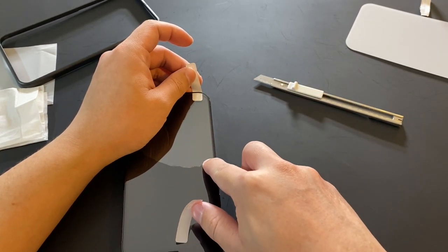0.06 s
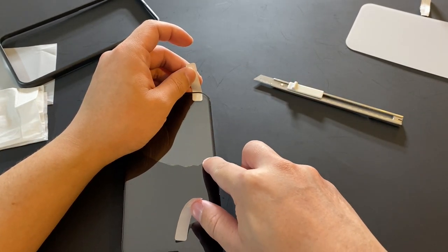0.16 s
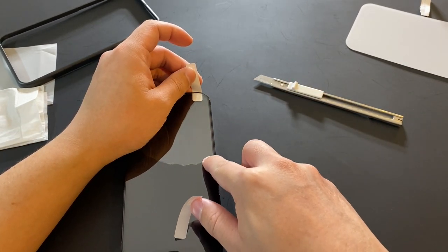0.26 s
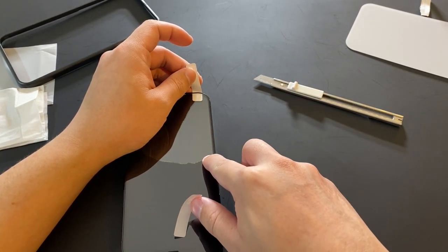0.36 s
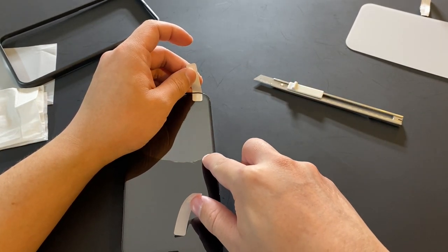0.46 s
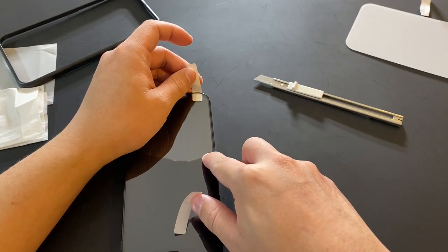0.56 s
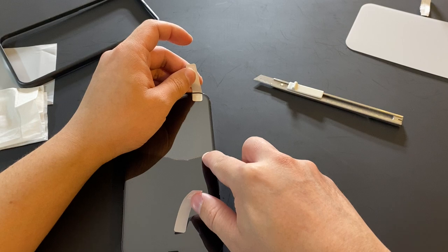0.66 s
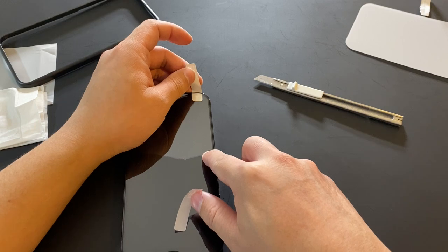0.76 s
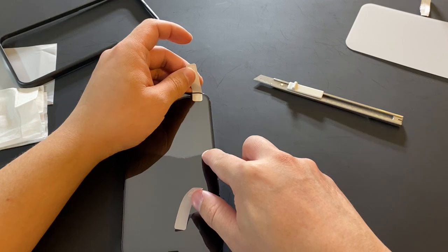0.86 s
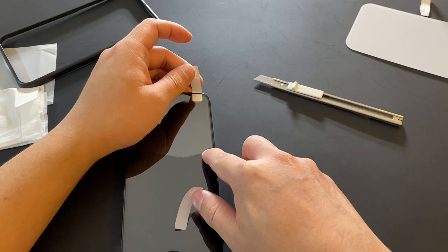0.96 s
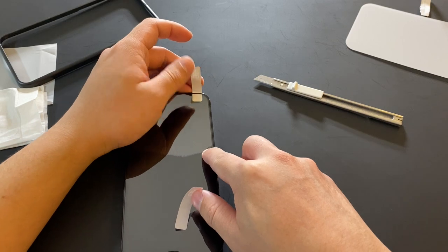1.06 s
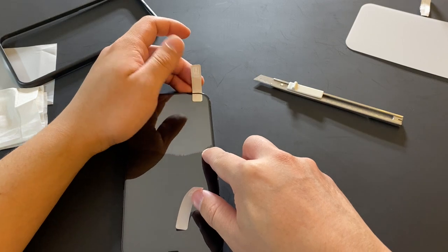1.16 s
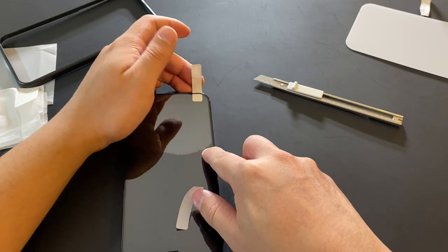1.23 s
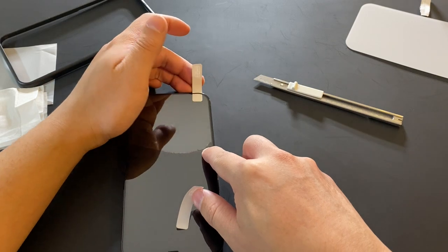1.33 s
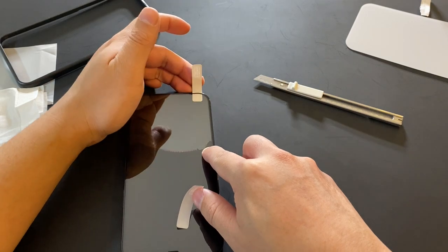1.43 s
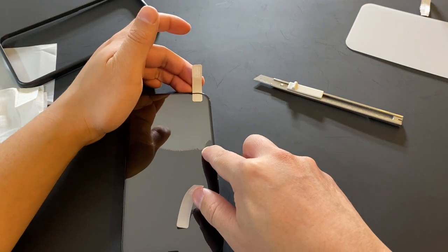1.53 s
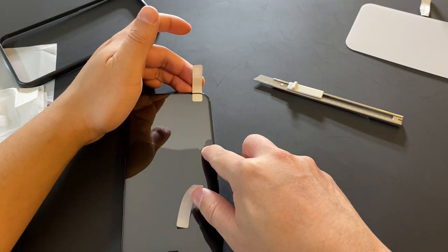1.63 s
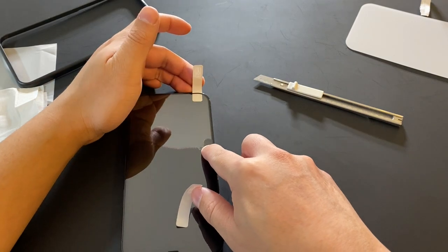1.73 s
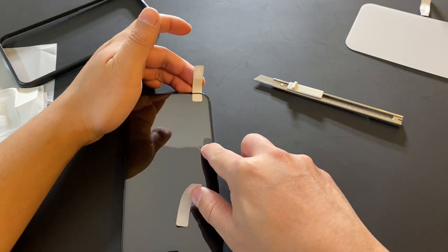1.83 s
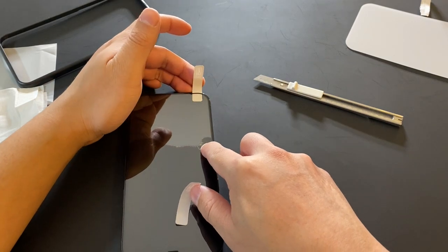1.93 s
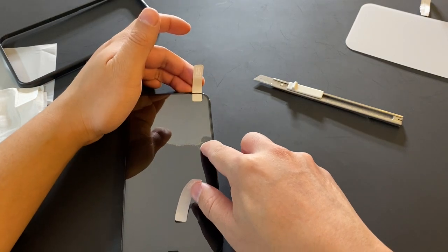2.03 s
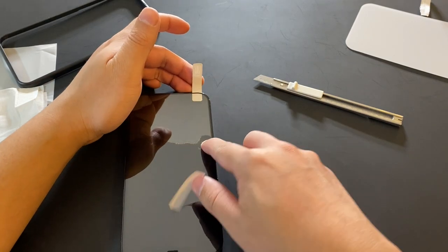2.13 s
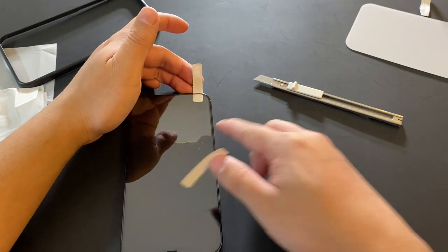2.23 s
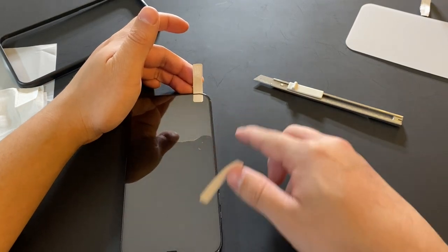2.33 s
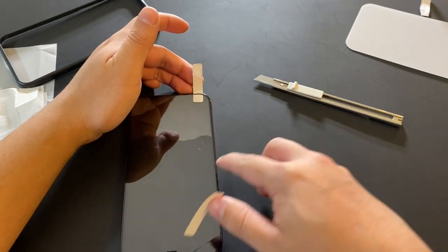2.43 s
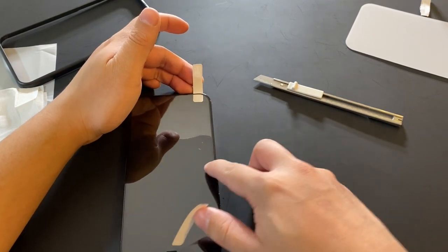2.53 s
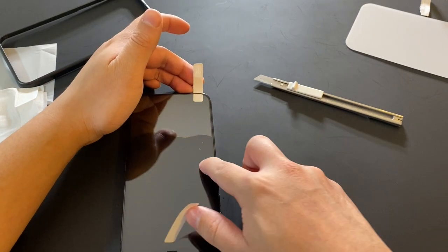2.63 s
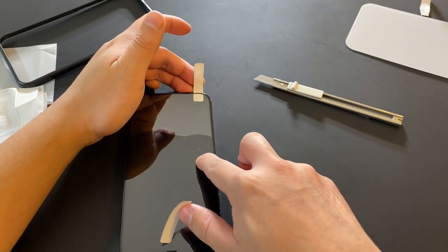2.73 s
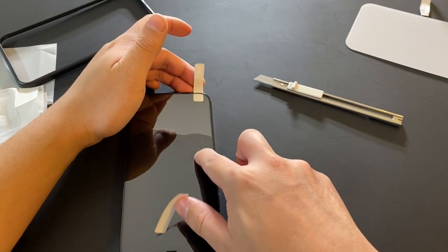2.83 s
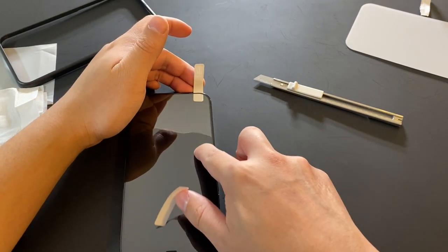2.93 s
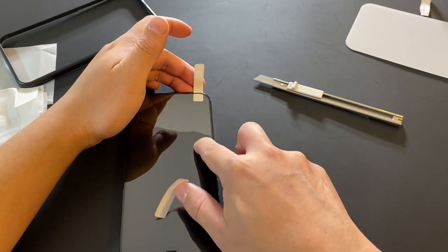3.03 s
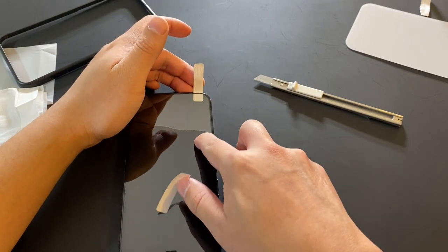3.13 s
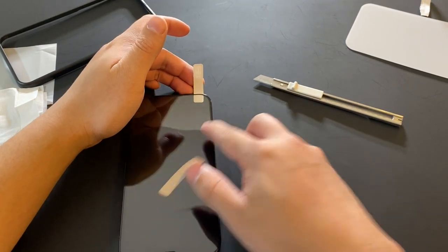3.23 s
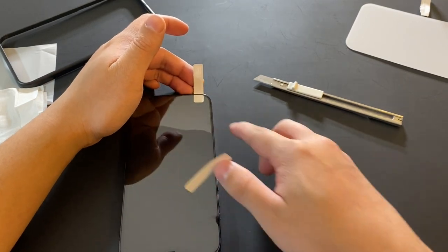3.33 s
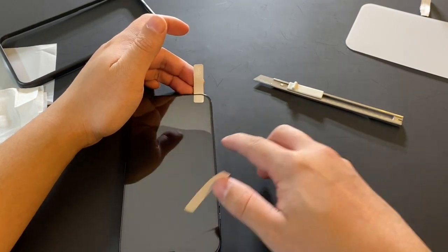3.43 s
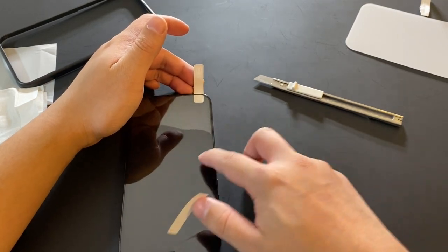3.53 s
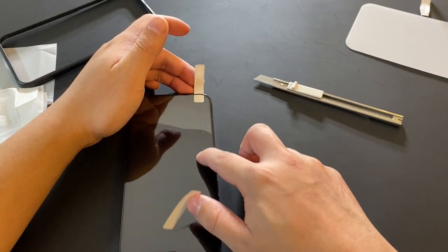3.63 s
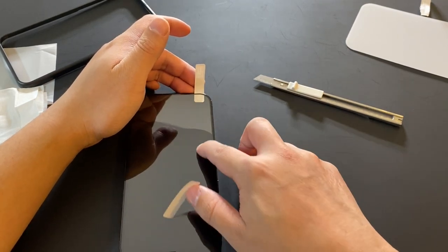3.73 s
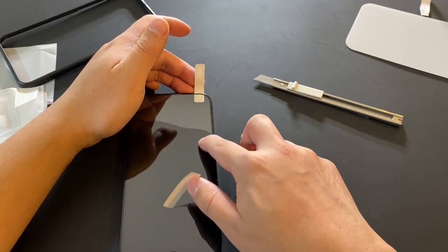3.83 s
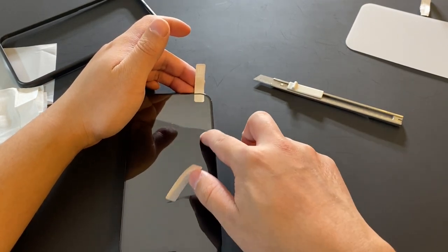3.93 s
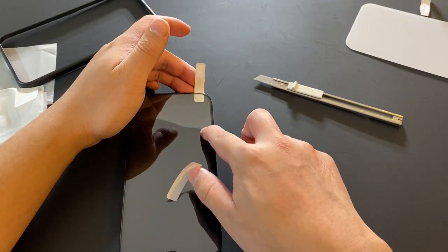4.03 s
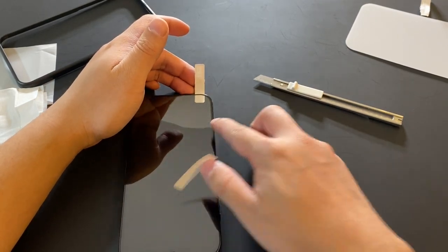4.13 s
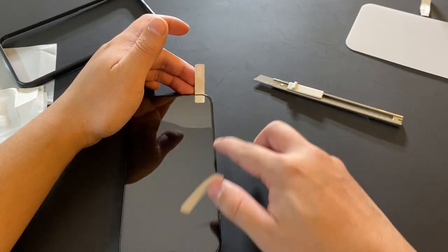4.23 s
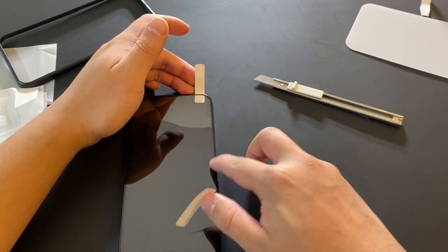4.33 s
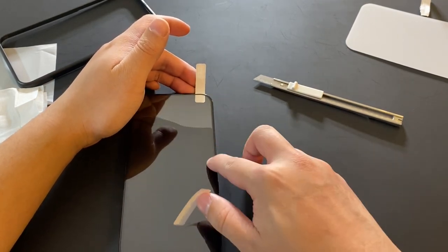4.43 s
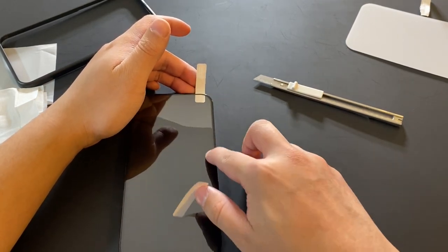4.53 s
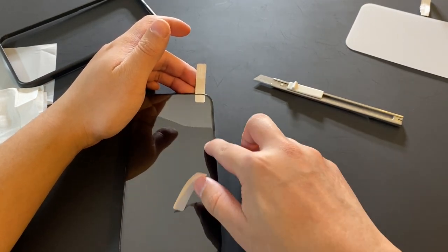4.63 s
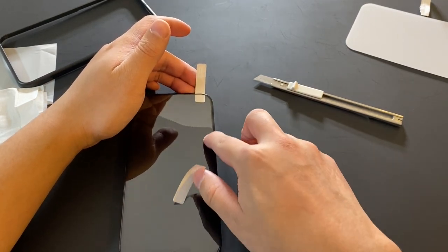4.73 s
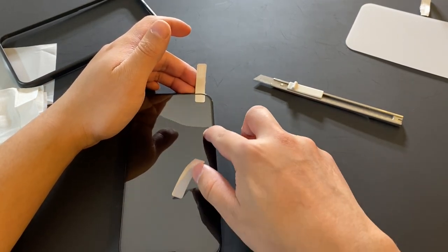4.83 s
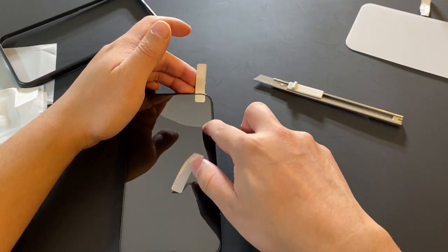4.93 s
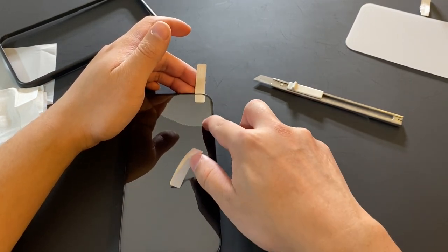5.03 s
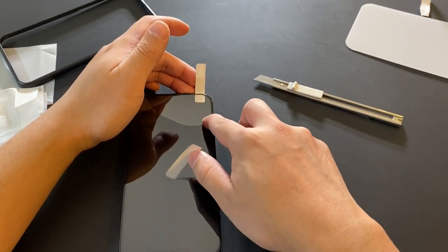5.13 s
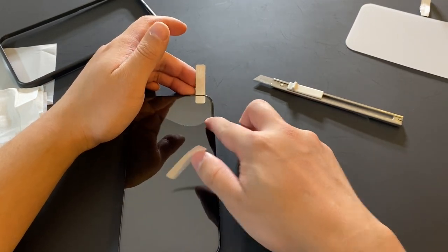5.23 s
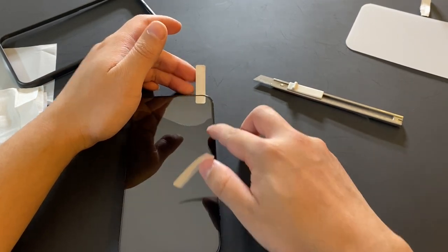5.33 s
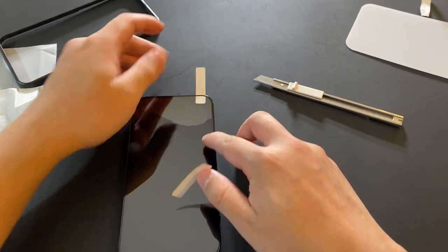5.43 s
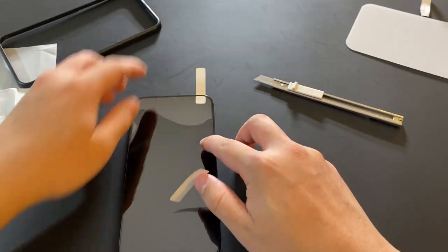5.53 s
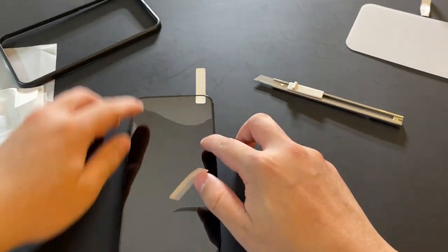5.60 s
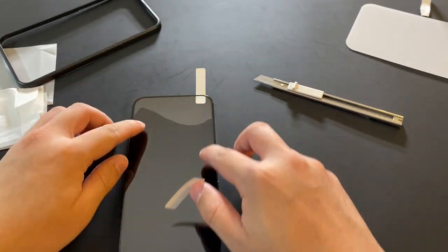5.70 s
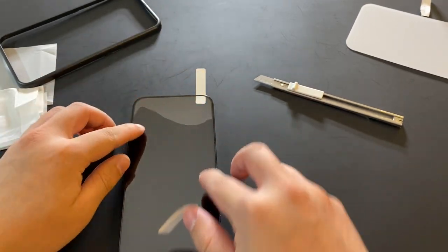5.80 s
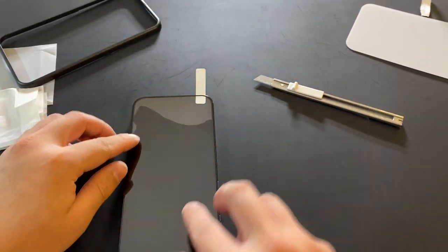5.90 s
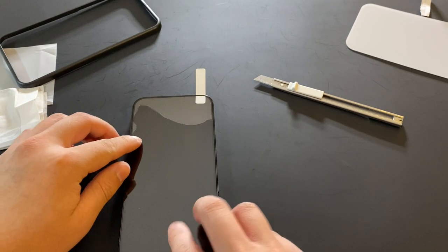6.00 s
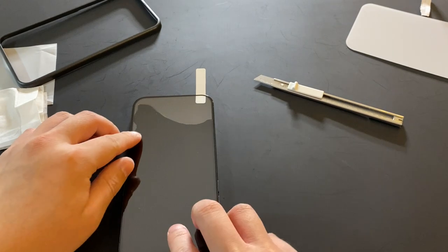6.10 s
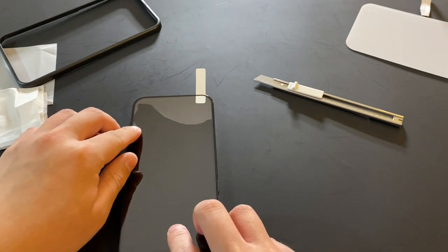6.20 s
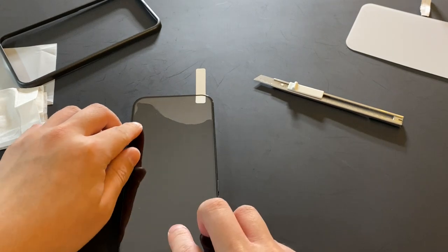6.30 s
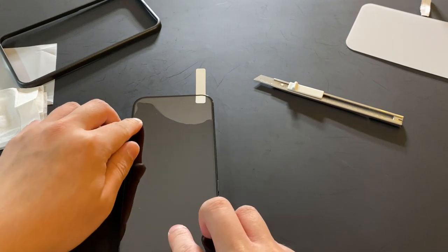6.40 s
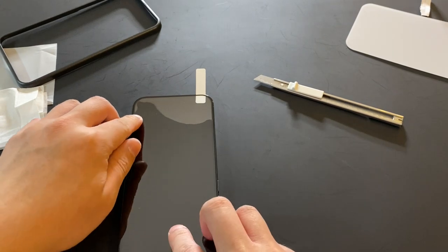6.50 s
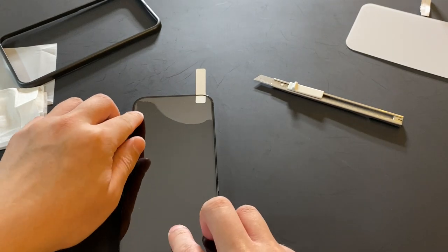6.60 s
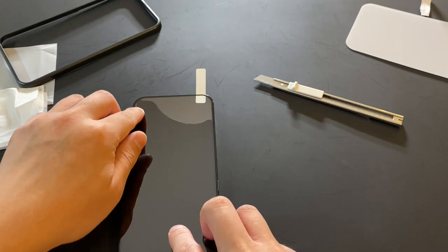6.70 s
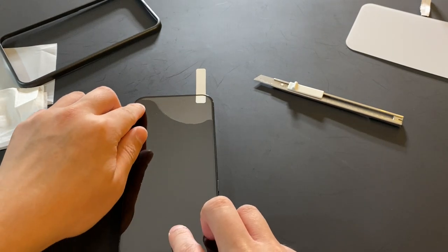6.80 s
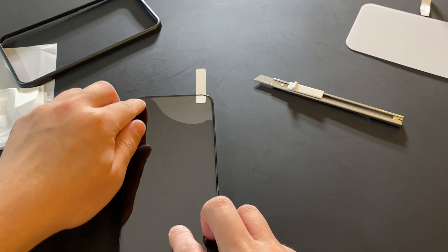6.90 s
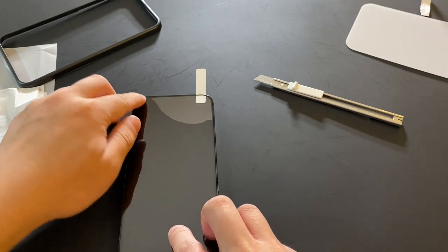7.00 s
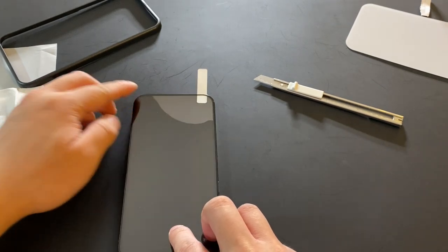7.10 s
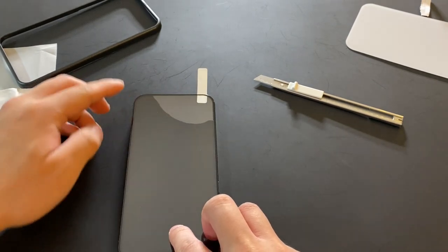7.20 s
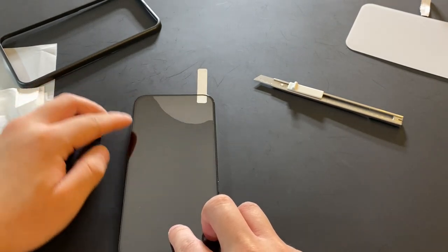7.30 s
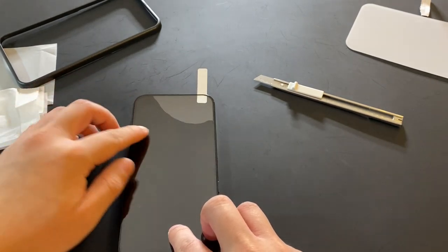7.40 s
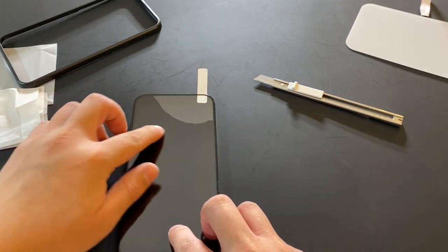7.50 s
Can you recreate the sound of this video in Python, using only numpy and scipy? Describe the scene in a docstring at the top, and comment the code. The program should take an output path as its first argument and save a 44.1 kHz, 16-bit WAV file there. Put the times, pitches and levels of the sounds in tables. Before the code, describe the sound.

A small quiet room, heard closely in stereo: soft low rumble and wavering hum, with faint hiss. Around 0.9 s there is a light skin tick and barely audible press. At 2.1 s a fingertip knocks firmly on the phone's glass, the loudest tap so far, dull and woody with desk boom; the phone rocks and lands again within a twentieth of a second. Similar taps follow at 2.6 (softer), 3.2, 4.05 and 4.35 s, the last just after a faint press, then a weak one at 5.15 s. Grainy skin slides whisper between them. From 5.5 to 6.5 s hands brush softly, with small ticks near 5.6 and 5.9 s and gentle presses. A low drone swells briefly at 6.6 s. At 7.03 s a sharper, glassier tap clacks and rebounds, then slight brushing fades into room tone.

```python
"""A low room hum and rumble come first: filtered noise and wavering tones in a small room.
Skin then ticks and slides on glass: short coloured bursts with a ring, and grainy noise strokes.
Fingertips tap a screen protector down onto a phone lying on a desk. Each tap rings modes of glass, phone
and desk top, which booms; the phone rocks and lands again. A close stereo microphone hears it."""
import sys
import numpy as np
from scipy import signal
from scipy.fft import rfft, irfft, next_fast_len
from scipy.io import wavfile

SR = 44100
rng = np.random.default_rng(int(sys.argv[2]) if len(sys.argv) > 2 else 0)


def generate_wav(sig):
    """Save sig (samples, or channels by samples) to the path in sys.argv[1] as 16-bit PCM at SR."""
    pcm = np.round(np.clip(np.atleast_2d(sig).T, -1, 1) * 32767).astype(np.int16)
    wavfile.write(sys.argv[1], SR, pcm)


N = 332955
TIME = np.arange(N) / SR  # seconds into the scene
AGE = TIME[:int(.65 * SR)]  # seconds since an event began; no single event lasts longer

# Event levels stand before the trims of their layer; colours are relative.

# Room noise all around the microphone. Each row: frequency in Hz, density in dB per Hz.
AIR_COLOUR = [(20, -16), (35, -10.5), (52, 4), (75, -6), (130, -2.5), (165, -4), (220, 1), (330, -9.5),
              (500, -15.5), (850, -19), (1400, -28.5), (2400, -44), (6500, -49), (15000, -56.5)]
# Its spread around the microphone. Each row: frequency in Hz, side relative to mid in dB.
AIR_WIDTH = [(60, -16), (110, -15.5), (200, -8), (380, -3), (700, 1.5), (1290, 2.5), (2380, -6), (4400, 0),
             (8120, -4.5), (15000, -6)]
AIR_DB, AIR_DRIFT_DB_PER_S, RUMBLE_TOP_HZ = -59.5, 0.6431, 1800  # only the rumble drifts
# Two hum tones: pitch, level at the start, slow drift.
LOW_HUM_HZ, LOW_HUM_DB, LOW_HUM_DRIFT_DB_PER_S = 96.5, -57, -0.52
UPPER_HUM_HZ, UPPER_HUM_DB, UPPER_HUM_DRIFT_DB_PER_S = 200, -68, .5
# Soft drones that swell and fade. Each row: peak in seconds, half length in seconds (to 1/e),
# frequency in Hz, level in dB.
DRONES = [(1.5, 0.1, 97, -50), (1.748, 0.39, 207.1, -59.5), (5.663, .14, 206, -57.5),
          (6.631, 0.13, 207, -43.5)]

# Light ticks of skin, nail and pull tab on the glass. Each row: start in seconds, level in dB,
# body below 3 kHz in dB, snap above 9 kHz in dB, ring in Hz.
TICKS = [(0.837, -62, -18, 9, 4520), (0.857, -55.5, -13, -1, 5430), (.876, -45.5, -0.5, 3, 2880),
         (2.639, -58, -6, -2, 2940), (4.299, -56.5, 5, -6, 3600), (5.553, -56, 1, -13, 2250),
         (5.578, -38.5, -4.5, -14, 5760), (5.876, -40, -11, -20, 3280), (5.993, -47, -1, -16, 3600),
         (6.066, -57, -5, -10, 4950), (6.2654, -65, -7, 0, 6660), (7.032, -42.5, 15, 0, 1900),
         (7.048, -27, 5, -23, 2650), (7.094, -40, 7, -7, 2700)]
# Skin meets the glass just before the knock of every tap.
TOUCH_LEAD_S, TOUCH_BODY_DB, TOUCH_SNAP_DB, TOUCH_HZ = 0.0053, -11, -11, 3840

# Soft presses that only nudge the phone; the first row is a light knock of the pull tab. Each row: start in
# seconds, # knock in dB, desk boom in dB relative to the knock, then the Hz at which desk and phone are driven
# most.
PRESSES = [(0.879, -46, -10, 900, 900), (4.301, -41.5, 9.5, 194, 990), (5.937, -46.5, 5, 310, 383),
           (5.978, -43, 3, 192, 433), (6.995, -40, 7.5, 230, 560)]
PRESS_CLACK_DB = -21  # glass clack relative to the knock
# Finger taps; the frame then catches on the desk, chatters once, rocks back and lands.
# Each row: start in seconds, knock in dB, desk boom and glass clack in dB relative to the knock,
# skin touch in dB, Hz at which desk and phone are driven most, catch after seconds, catch in dB relative
# to the knock, landing after seconds, landing in dB relative to the knock, Hz of desk and phone at landing.
TAPS = [(2.140, -15, -5, -19.5, -43, 250, 673, 0.0065, -7, .056, -8.5, 161, 590),
        (2.611, -24.5, -6.5, -24, -44, 178, 390, 0.0066, -18, .029, -6.5, 120, 420),
        (3.1669, -21, -3.5, -26.5, -44.5, 196, 675, 0.0066, -8.5, .046, -8, 163, 587),
        (4.057, -17, -5, -23.5, -46.5, 190, 665, 0.0066, -5.5, .051, -11.5, 148, 624),
        (4.352, -19.5, -6.5, -18.5, -39, 330, 390, .007, -20, .029, -6.5, 122, 428),
        (5.151, -29.5, 3, -31, -51, 173, 640, 0.0072, -12, .026, -13, 165, 434),
        (7.033, -18, -4, -6.5, -44, 285, 866, 0.015, -0.5, .060, -6, 270, 340)]
# Boom is relative to its own blow; clack is added to that of the tap.
CATCH_BOOM_DB, CATCH_CLACK_DB, CATCH_HZ = 2, 4.5, 393  # brighter than its tap
# A dull bump part of the way to the landing, its level relative to the knock.
CHATTER_SHARE, CHATTER_DB, CHATTER_BOOM_DB, CHATTER_CLACK_DB = .36, -15.5, 5, -3
LANDING_BOOM_DB, LANDING_CLACK_DB = -2, -5  # duller than its tap

# Modes of the desk top. Each row: frequency in Hz, level in dB, t60 in seconds.
DESK = [(106.1, -11, 0.34), (123.24, 0, 0.58), (155.24, -3, 0.56), (191.35, -0.5, 0.49), (236, 0, 0.18),
        (266.2, 0, 0.19), (302.3, -6, 0.21), (338.6, -7.5, 0.11), (402, -3, 0.17)]
# Modes of the phone lying on the desk. Each row: frequency in Hz, level in dB, t60 in seconds.
PHONE = [(354, 8.5, 0.11), (395.5, -5.5, 0.64), (436.4, 13.5, 0.17), (543, 3, 0.25), (766, 2, 0.18),
         (794, -4.5, 0.097), (873, -9, 0.31), (1018, -18.5, 0.31), (1283, -10, 0.21)]
# Modes of glass and frame. Each row: frequency in Hz, level in dB, t60 in seconds.
GLASS = [(1370, 0.5, 0.069), (1557, -14, 0.15), (1830, -9, 0.056), (2053, -4.5, 0.033), (2568, -4, 0.031),
         (2723, -8, 0.029), (3310, -4.5, 0.031), (3780, -25.5, 0.078)]
# Dense, unresolved ringing of desk, phone and glass. Each row: frequency in Hz, level in dB.
BOOM_COLOUR = [(30, -32), (60, -4.5), (120, -1), (260, 3), (400, -14), (700, -23.5)]
KNOCK_COLOUR = [(180, -14), (370, 13.5), (550, -3), (780, -6.5), (1100, -10), (1550, -18.5), (1900, -41),
                (3000, -52.5)]
CLACK_COLOUR = [(600, 4), (1350, 7), (2000, -3.5), (2700, -8.5), (3200, -6.5), (3700, -14), (4600, -19.5),
                (6500, -28), (8500, -28), (15500, -30)]

# Skin on glass: low brush, hiss, fine sheen. Each row: frequency in Hz, level in dB.
BRUSH_COLOUR = [(500, 8), (1100, 8.5), (1800, 4.5), (2300, 4.5), (2750, 5.5), (3150, -10), (4000, -0.5),
                (5200, -59)]
HISS_COLOUR = [(2200, 2), (4000, 1.5), (5500, 0), (7200, 2), (8600, -8.5), (11000, -25.5)]
SHEEN_COLOUR = [(7500, -28), (9800, -1), (12000, -4), (13600, -0.5), (15500, -4)]
# A fingertip slides on the glass. Each row: start in seconds, length in seconds, hiss in dB,
# fine sheen in dB relative to the hiss.
SLIDES = [(2.127, .07, -64.5, -1.5), (2.199, 0.13, -73.5, 0), (2.484, 0.067, -80, -5),
          (3.182, 0.1, -59.5, -2), (3.382, 0.12, -70, -12), (3.496, 0.14, -71.5, -20),
          (3.817, 0.092, -73.5, -11.5), (4.058, .14, -66, -8.5), (4.774, 0.28, -86.5, -4.5),
          (5.266, 0.15, -63.5, -1.5), (5.524, 0.16, -70, -8), (5.664, 0.19, -64, -5.5),
          (7.085, 0.14, -69.5, -5), (7.28, 0.051, -84, 6), (7.372, 0.049, -74, -32)]
SLIDE_BRUSH_DB = -11.5  # soft brush under the hiss
# A hand brushes over desk and phone. Each row: start in seconds, length in seconds, level in dB.
BRUSHES = [(2.85, .11, -79), (3.058, .1, -70.5), (3.27, 0.42, -73.5), (3.813, 0.13, -76),
           (4.418, 0.22, -74), (4.74, 0.42, -77.5), (5.514, 0.37, -65), (5.87, 0.467, -65),
           (6.338, 0.15, -75.5), (6.673, 0.64, -79), (6.91, .11, -69), (7.141, 0.17, -70.5),
           (7.36, 0.073, -59), (7.45, 0.11, -81)]
BRUSH_HISS_DB, BRUSH_SHEEN_DB = -19.5, -30.5  # faint treble over the brush
# The hand brushes in ahead of each tap: level relative to the knock, treble relative to the brush.
APPROACH_S, APPROACH_DB, APPROACH_HISS_DB, APPROACH_SHEEN_DB = 0.079, -51.5, -7.5, -15.5
# Every stroke swells and sags by this much per stroke length; past its length a release adds to the sag.
STROKE_ATTACK_S, STROKE_SAG_DB, STROKE_RELEASE_T60_S = 0.058, 3.5, 0.21
# Early echoes of the sliding skin from desk and phone. Each row: delay in seconds, level in dB.
ECHOES = [(.0007, -41), (.0017, -31.5), (.0043, -15)]

# Stereo width of everything close by. Each row: frequency in Hz, side relative to mid in dB.
WIDTH = [(60, -19), (120, -13), (250, -9), (500, -6), (1000, -3), (2400, -5), (5000, -5), (9000, -9),
         (15000, -12)]
# Lean of the two microphone ports. Each row: frequency in Hz, left minus right in dB.
BALANCE_DB = [(60, 2), (200, 1.95), (380, 2), (680, 0), (1200, 2.5), (2400, -5.5), (4400, -3.5),
              (9000, -0.5)]
PORT_LAG_S, PORT_LAG_FROM_HZ = .000208, 6300  # right port behind left, above this frequency
TOP_HZ = 15900


def undb(db):
    """Decibels to gain."""
    return 10 ** (np.asarray(db) / 20)


def response(f, points):
    """Gain at each frequency through (Hz, dB) points, with a second-order skirt beyond either end."""
    hz, db = np.transpose(points)
    skirts = np.minimum(f / hz[0], 1) ** 2 * np.minimum(hz[-1] / f, 1) ** 2
    return skirts * undb(np.interp(np.log(f), np.log(hz), db))


def frequencies(size):
    """Spectrum bins in Hz, kept above zero for the logarithm."""
    return np.maximum(np.fft.rfftfreq(size, 1 / SR), 1)


def shape(x, points):
    """Filter by a spectrum of (Hz, dB) points."""
    size = next_fast_len(x.shape[-1] + 2048)
    return irfft(rfft(x, size) * response(frequencies(size), points), size)[..., :x.shape[-1]]


def noise(colour, size, width=WIDTH):
    """Stereo noise from independent mid and side; the mid has rms 1 and the width table scales the side."""
    mid, side = shape(rng.standard_normal((2, size)), colour)
    side = shape(side, width)
    return np.array([mid + side, mid - side]) / np.std(mid)


def walk(rate):
    """Random wander of spread 1 along straight lines, rate steps a second; holds after 4096 steps."""
    steps = np.interp(TIME * rate, np.arange(4096), rng.standard_normal(4096))
    return steps / np.std(steps)


def fade(t60):
    """Exponential decay by 60 dB in t60 seconds."""
    return np.exp(-np.log(1000) * AGE / t60)


def add(out, s, sound):
    """Mix a sound in at a time."""
    start = max(int(s * SR), 0)
    out[:, start:start + sound.shape[-1]] += sound[..., :N - start]


def tone(hz, waver, rate):
    """A hum whose strength and phase waver."""
    wander = 1 + waver * (walk(rate) + 1j * walk(rate))
    return np.real(wander * np.exp(2j * np.pi * hz * TIME))


def background():
    """Room rumble that slowly grows under a steady hiss, two wavering hum tones and passing drones."""
    air = noise(AIR_COLOUR, N, AIR_WIDTH) * undb(AIR_DB)
    rumble = shape(air, [(1, 0), (RUMBLE_TOP_HZ, 0)])
    hiss = air - rumble
    rumble_gain = undb(AIR_DRIFT_DB_PER_S * TIME + 0.4 * walk(5.1))
    low = tone(LOW_HUM_HZ, waver=0.23, rate=7.8) * undb(LOW_HUM_DB + LOW_HUM_DRIFT_DB_PER_S * TIME)
    upper = tone(UPPER_HUM_HZ, waver=1.0, rate=18) * undb(UPPER_HUM_DB + UPPER_HUM_DRIFT_DB_PER_S * TIME)
    drones = np.zeros(N)
    for s, half_s, hz, db in DRONES:
        swell = np.exp(-((TIME - s) / half_s) ** 2)
        drones += tone(hz, waver=0.07, rate=7.2) * undb(db) * swell
    return hiss + rumble * rumble_gain + low + upper + drones


def impulse(colour):
    """The most compact causal (minimum-phase) pulse that has this colour; energy 1."""
    cepstrum = irfft(np.log(response(frequencies(len(AGE)), colour)), len(AGE))
    cepstrum[1:] *= 2 * (AGE[1:] < AGE[-1] / 2)  # fold onto positive time
    pulse = irfft(np.exp(rfft(cepstrum)), len(AGE))
    return pulse / np.linalg.norm(pulse)


def wash(colour, t60, room_db, room_t60, rise_s, pulse_db):
    """A first pulse, dense ringing that dies away, then its reverberation in the room."""
    direct = fade(t60) * (1 - np.exp(-AGE / rise_s))
    room = undb(room_db) * fade(room_t60) * (1 - np.exp(-AGE / 0.0044))
    envelope = np.hypot(direct, room)
    dense = noise(colour, len(AGE)) * envelope
    dense = dense / np.linalg.norm(dense.mean(axis=0))
    return np.linalg.norm(envelope) * (dense + undb(pulse_db) * impulse(colour))


def ticks():
    """Tiny contacts as skin meets or leaves the glass, each with a brief ring; one leads every tap."""
    out = np.zeros((2, N))
    body = wash(BRUSH_COLOUR, t60=0.011, room_db=-21, room_t60=0.22, rise_s=0.00029, pulse_db=9.0)
    hiss = wash(HISS_COLOUR, t60=0.013, room_db=-18, room_t60=0.2, rise_s=0.0012, pulse_db=1.0)
    snap = wash(SHEEN_COLOUR, t60=0.0069, room_db=-15.0, room_t60=0.095, rise_s=0.0005, pulse_db=-0.5)
    touches = [(s - TOUCH_LEAD_S, touch_db, TOUCH_BODY_DB, TOUCH_SNAP_DB, TOUCH_HZ)
               for s, _, _, _, touch_db, *_ in TAPS]
    for s, db, body_db, snap_db, hz in TICKS + touches:
        ring = undb(-5.5) * fade(0.022) * np.sin(2 * np.pi * hz * AGE)
        tick = undb(body_db) * body + undb(-2) * hiss + undb(snap_db + 6) * snap + ring
        add(out, s, undb(db) * tick)
    return out * undb(-8)


def modes(table, build_s):
    """The free swing of each mode; all fall into step once the blow has spread through the body."""
    swell = 1 - np.exp(-2 * AGE / build_s)
    return np.array([swell * fade(t60) * np.sin(2 * np.pi * hz * (AGE - build_s)) for hz, _, t60 in table])


def drive(table, centre_hz, focus_db):
    """Where and how softly a blow lands sets which modes it drives hardest; focus in dB per octave."""
    hz, db, _ = np.transpose(table)
    gain = undb(db - focus_db * np.abs(np.log2(hz / centre_hz)))
    return gain / np.linalg.norm(gain)


def bounce(hz, rise_s):
    """The phone on its soft contact with the desk: a few cycles that swell and die at once."""
    age = AGE / rise_s
    return age ** 2 * np.exp(2 - 2 * age) * np.sin(2 * np.pi * hz * AGE)


def blows():
    """A tap is four blows (knock, catch, chatter, landing), a press is one."""
    # each blow: seconds, dB, boom dB, clack dB, desk Hz, phone Hz
    for (s, db, boom_db, clack_db, _, desk_hz, phone_hz,
         catch_s, catch_db, landing_s, landing_db, *landing_hz) in TAPS:
        yield s, db, boom_db, clack_db, desk_hz, phone_hz
        yield s + catch_s, db + catch_db, CATCH_BOOM_DB, clack_db + CATCH_CLACK_DB, desk_hz, CATCH_HZ
        chatter_s = s + CHATTER_SHARE * landing_s
        yield chatter_s, db + CHATTER_DB, CHATTER_BOOM_DB, clack_db + CHATTER_CLACK_DB, desk_hz, CATCH_HZ
        yield s + landing_s, db + landing_db, LANDING_BOOM_DB, clack_db + LANDING_CLACK_DB, *landing_hz
    for s, db, boom_db, desk_hz, phone_hz in PRESSES:
        yield s, db, boom_db, PRESS_CLACK_DB, desk_hz, phone_hz


def taps():
    """Every tap or press rings the same glass, phone and desk; the glass modes build up fastest."""
    out = np.zeros((2, N))
    desk, phone = modes(DESK, build_s=0.00682), modes(PHONE, build_s=.008)
    body = undb(-8.5) * wash(KNOCK_COLOUR, t60=0.13, room_db=-15.0, room_t60=0.39,
                             rise_s=0.00055, pulse_db=-9.5)
    glass = undb(-2) * (drive(GLASS, centre_hz=2140, focus_db=12) @ modes(GLASS, build_s=0.001068))
    clack = glass + undb(4.0) * wash(CLACK_COLOUR, t60=0.019, room_db=-24.5, room_t60=0.51,
                                     rise_s=0.00037, pulse_db=-12.5)
    for s, db, boom_db, clack_db, desk_hz, phone_hz in blows():
        boom = undb(-2.0) * (drive(DESK, desk_hz, focus_db=12.5) @ desk)
        boom = boom + undb(-9.5) * wash(BOOM_COLOUR, t60=0.22, room_db=-2.5, room_t60=0.5,
                                        rise_s=0.0082, pulse_db=-35.5)
        phone_ring = undb(-11.5) * (drive(PHONE, phone_hz, focus_db=1.5) @ phone)
        knock = undb(-1.5) * bounce(phone_hz, rise_s=0.0015) + phone_ring + body
        add(out, s, undb(db) * (undb(boom_db) * boom + knock + undb(clack_db) * clack))
    return out * undb(-2)


def strokes():
    """Strength of hiss, brush and sheen over time: all strokes share one attack, sag and release."""
    # each row: seconds, length, then hiss, brush and sheen in dB
    rows = [(s, length, db, db + SLIDE_BRUSH_DB, db + sheen_db) for s, length, db, sheen_db in SLIDES]
    rows += [(s, length, db + BRUSH_HISS_DB, db, db + BRUSH_SHEEN_DB) for s, length, db in BRUSHES]
    for s, knock_db, *_ in TAPS:
        db = knock_db + APPROACH_DB
        rows.append((s - APPROACH_S, APPROACH_S, db + APPROACH_HISS_DB, db, db + APPROACH_SHEEN_DB))
    effort = np.zeros((3, N))
    attack = np.minimum(AGE / STROKE_ATTACK_S, 1) ** 2
    for s, length, *levels_db in rows:
        sag = undb(-STROKE_SAG_DB * AGE / length)
        release = np.exp(-np.log(1000) * np.maximum(AGE - length, 0) / STROKE_RELEASE_T60_S)
        add(effort, s, np.outer(undb(levels_db), attack * sag * release))
    return effort


def slides():
    """Skin ridges catch and let go: a grainy hiss follows each stroke, combed by nearby surfaces."""
    dry = np.zeros((2, N))
    grip = undb(2.04 * walk(45) + 0.5 * walk(600))
    layers = [(HISS_COLOUR, -2.5), (BRUSH_COLOUR, -1), (SHEEN_COLOUR, 0)]  # colour, trim in dB
    for effort, (colour, trim_db) in zip(strokes(), layers):
        dry += noise(colour, N) * effort * undb(trim_db) * grip
    out = dry.copy()
    for delay_s, db in ECHOES:
        add(out, delay_s, undb(db) * dry)
    return out


def microphone(sound):
    """Two ports: each band leans a little to one side; the high treble reaches the right port later."""
    size = next_fast_len(N + 2048)
    f = frequencies(size)
    hz, db = np.transpose(BALANCE_DB)
    lean = undb(np.interp(np.log(f), np.log(hz), db) / 2)  # half of the lean to each port
    turn = np.exp(1j * np.pi * PORT_LAG_S * np.maximum(f - PORT_LAG_FROM_HZ, 0))  # half of the lag
    ports = np.array([lean * turn, 1 / (lean * turn)])
    return irfft(rfft(sound, size) * ports, size)[:, :N]


def scene():
    """Everything at the desk, as the two ports hear it."""
    return microphone(background() + ticks() + taps() + slides())


def record(dry):
    """The recorder cuts the top with a steep elliptic low-pass."""
    return signal.sosfilt(signal.ellip(8, .2, 70, TOP_HZ, fs=SR, output="sos"), dry)


dry = scene()
out = record(dry)
generate_wav(out)
```